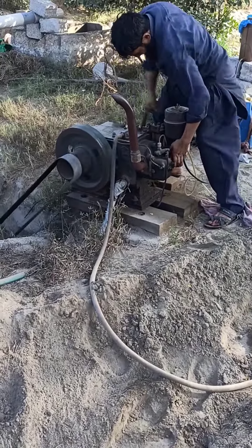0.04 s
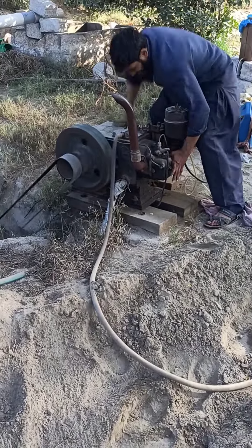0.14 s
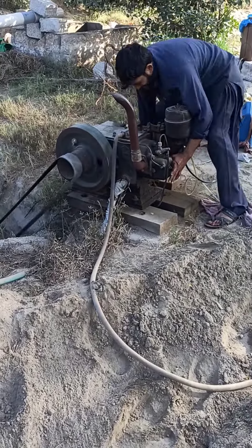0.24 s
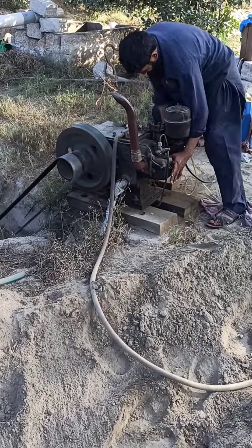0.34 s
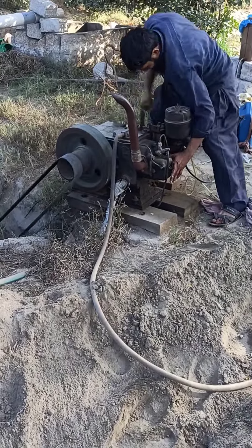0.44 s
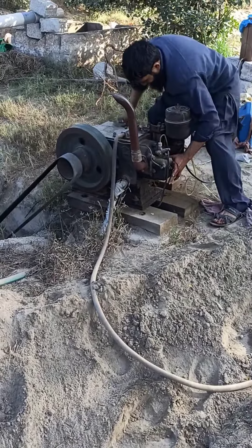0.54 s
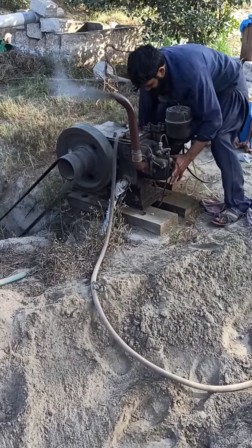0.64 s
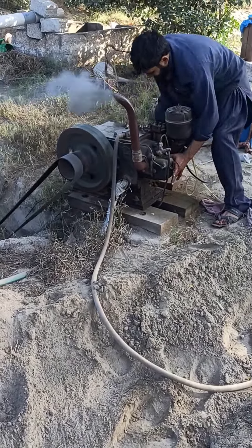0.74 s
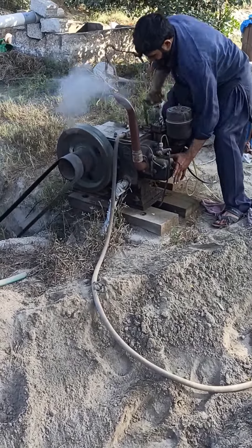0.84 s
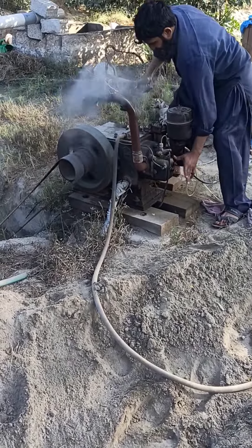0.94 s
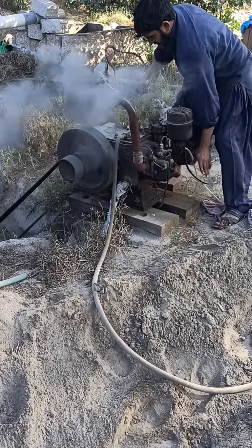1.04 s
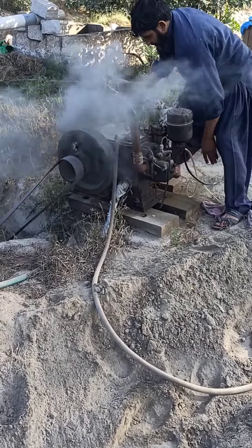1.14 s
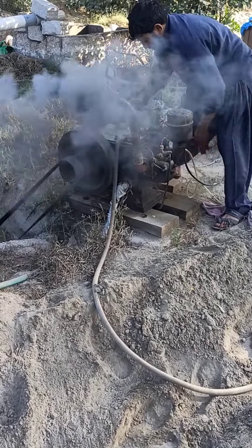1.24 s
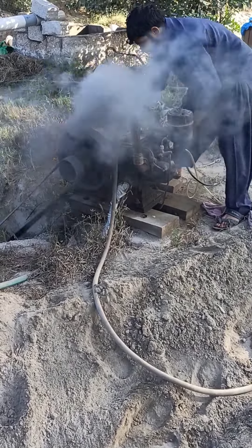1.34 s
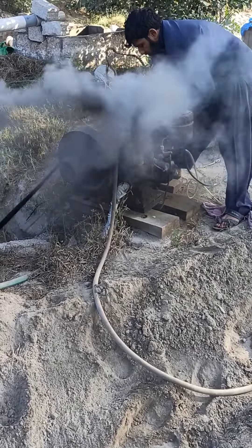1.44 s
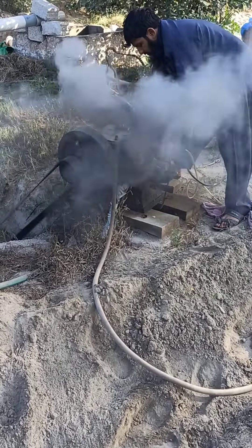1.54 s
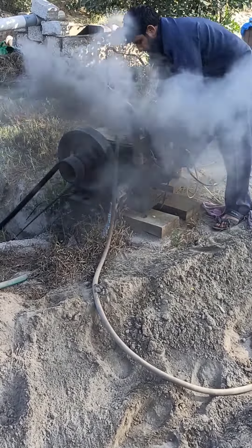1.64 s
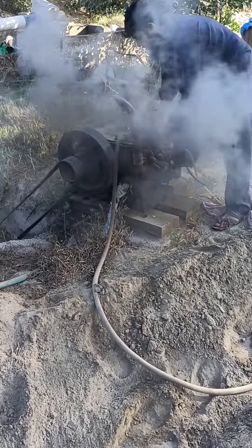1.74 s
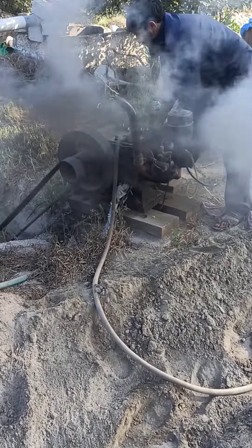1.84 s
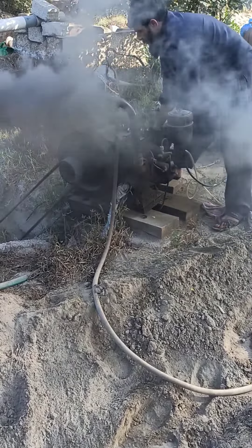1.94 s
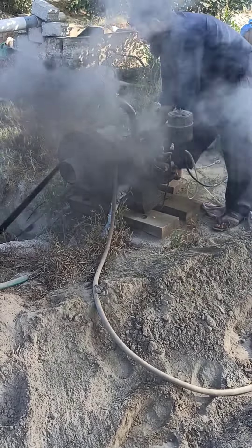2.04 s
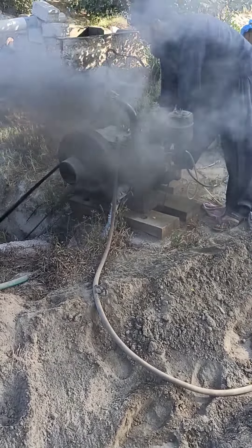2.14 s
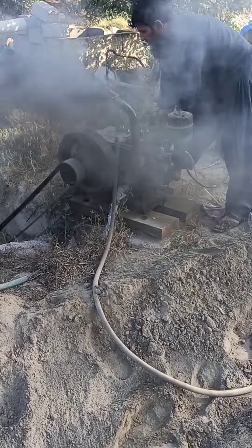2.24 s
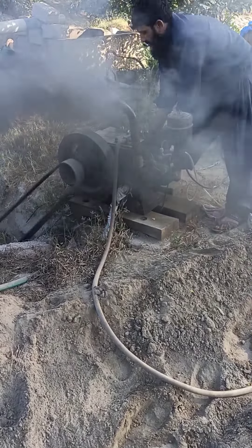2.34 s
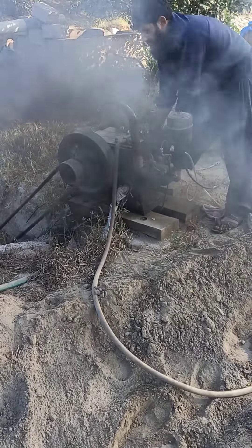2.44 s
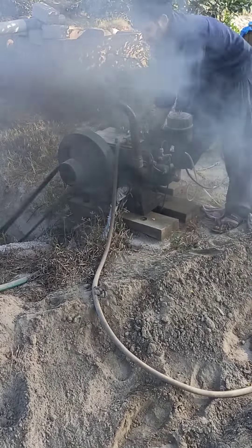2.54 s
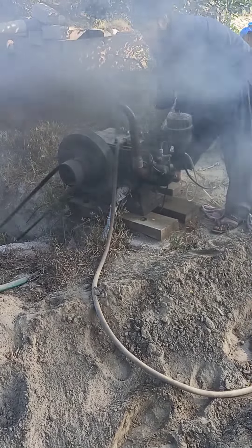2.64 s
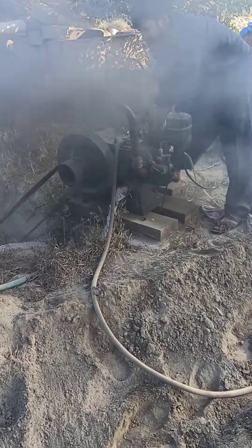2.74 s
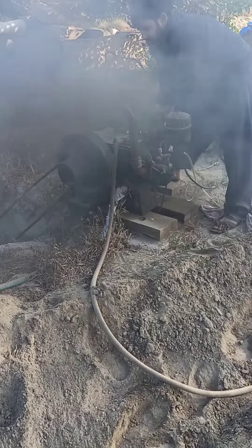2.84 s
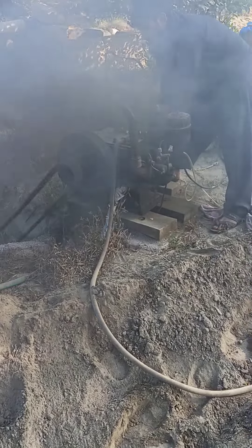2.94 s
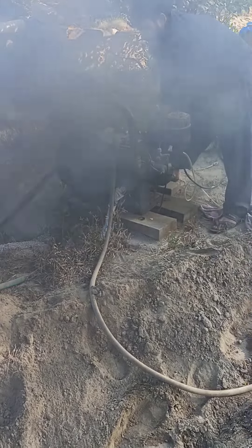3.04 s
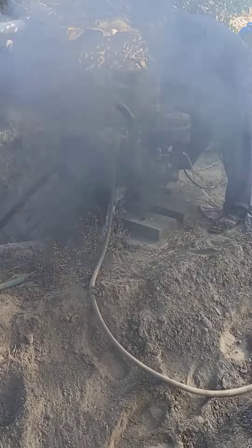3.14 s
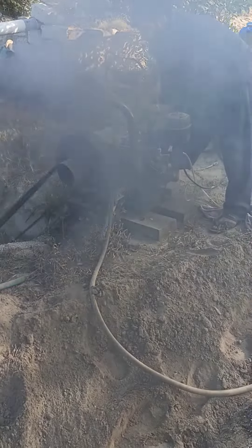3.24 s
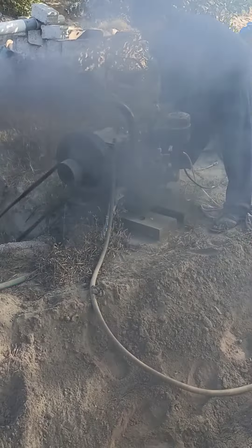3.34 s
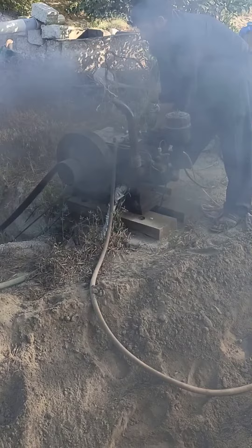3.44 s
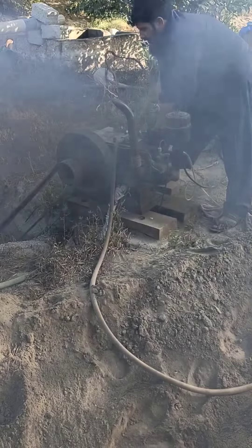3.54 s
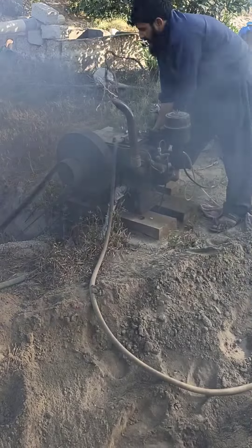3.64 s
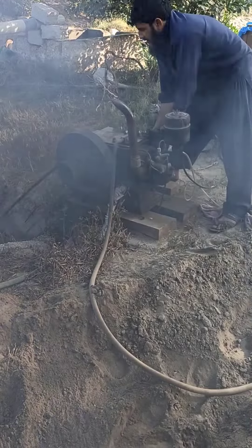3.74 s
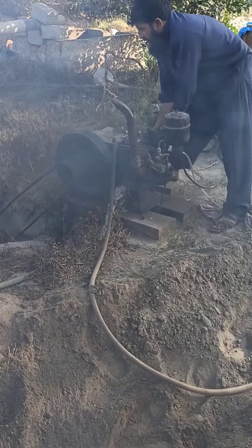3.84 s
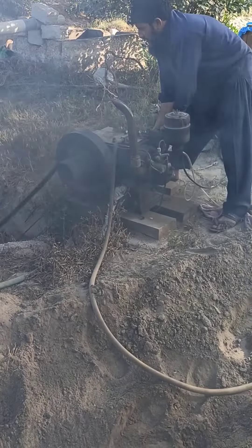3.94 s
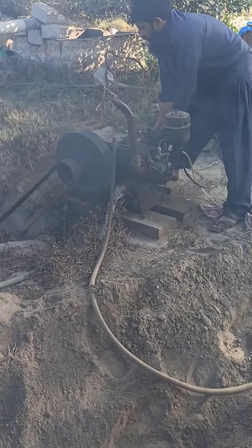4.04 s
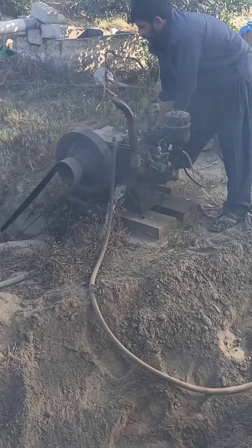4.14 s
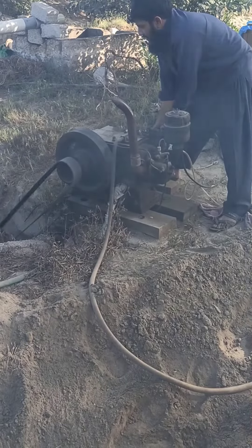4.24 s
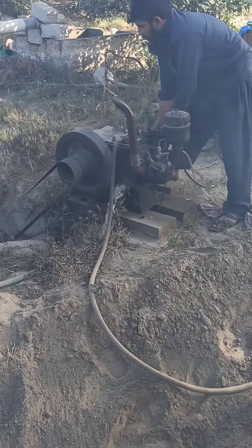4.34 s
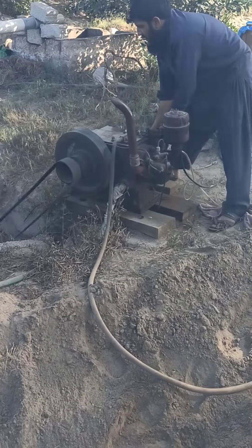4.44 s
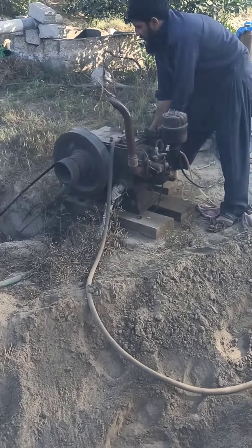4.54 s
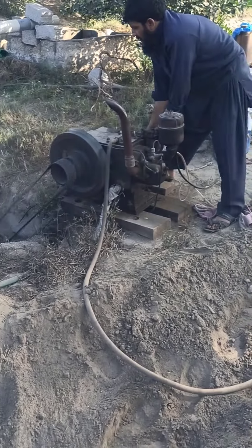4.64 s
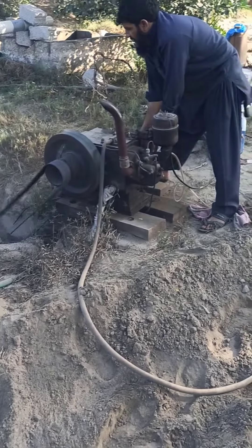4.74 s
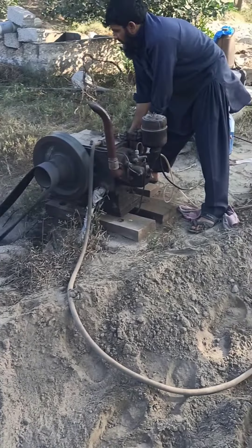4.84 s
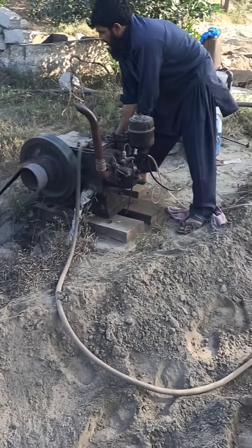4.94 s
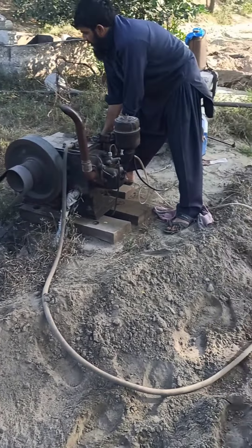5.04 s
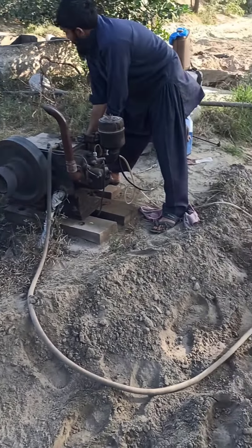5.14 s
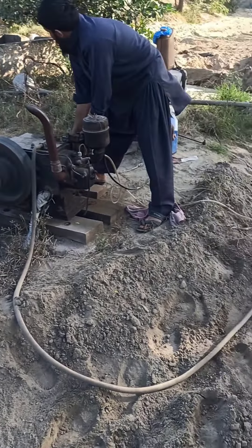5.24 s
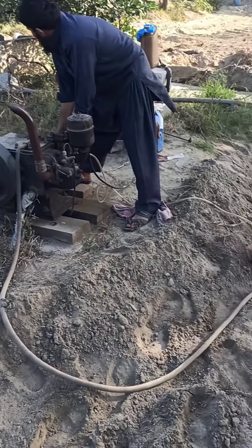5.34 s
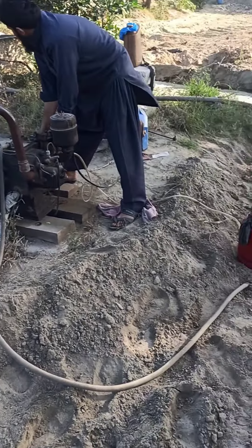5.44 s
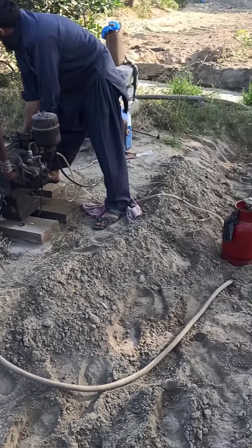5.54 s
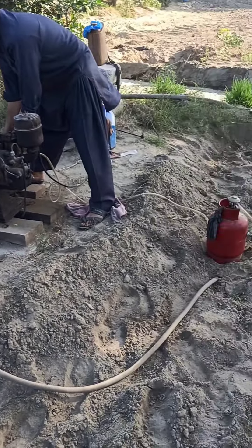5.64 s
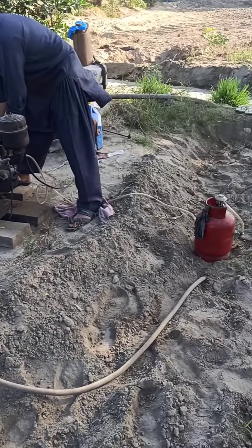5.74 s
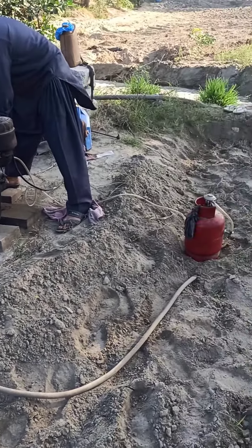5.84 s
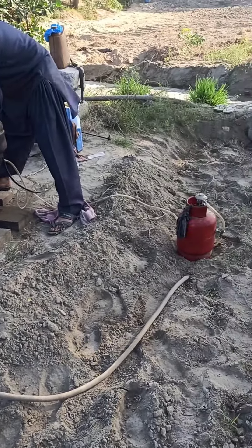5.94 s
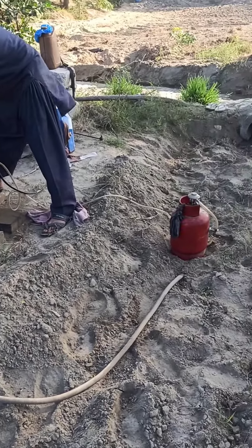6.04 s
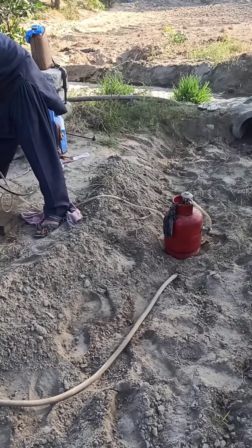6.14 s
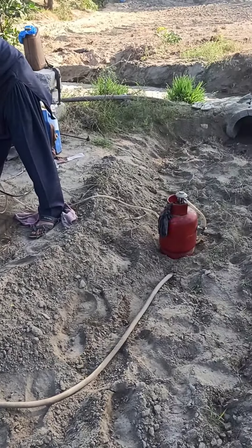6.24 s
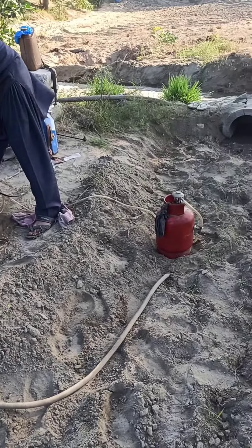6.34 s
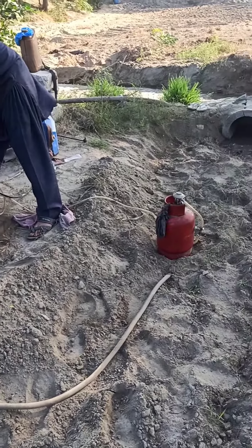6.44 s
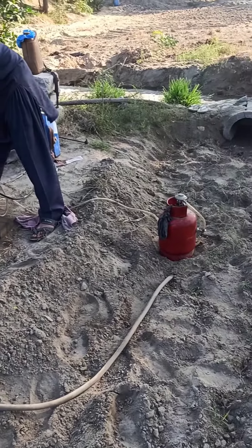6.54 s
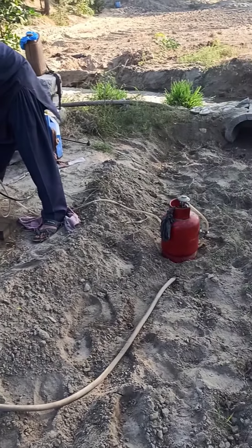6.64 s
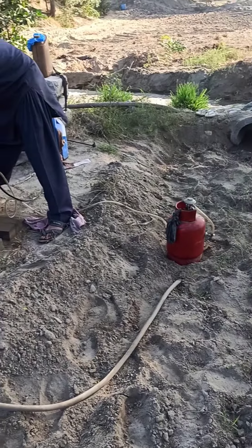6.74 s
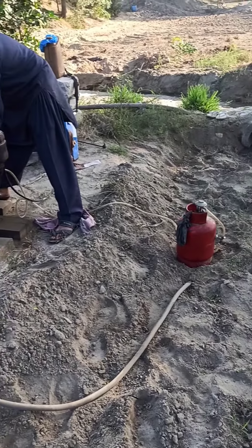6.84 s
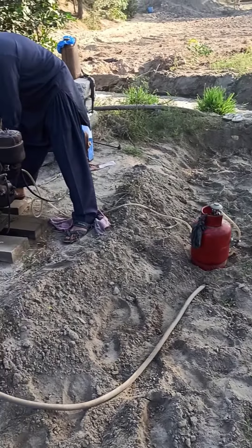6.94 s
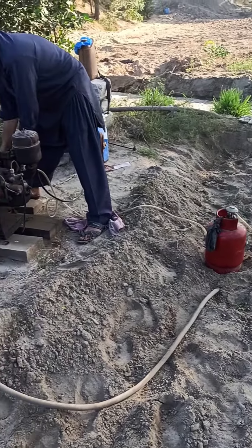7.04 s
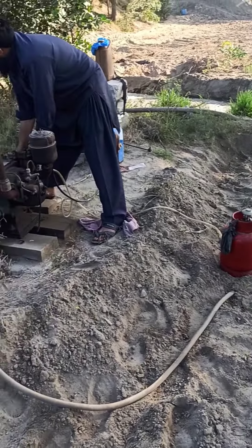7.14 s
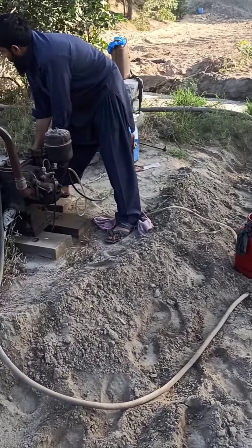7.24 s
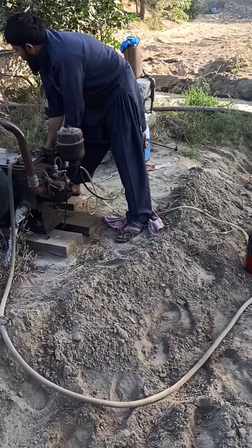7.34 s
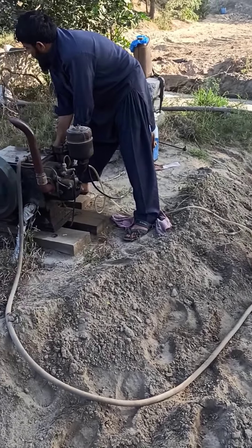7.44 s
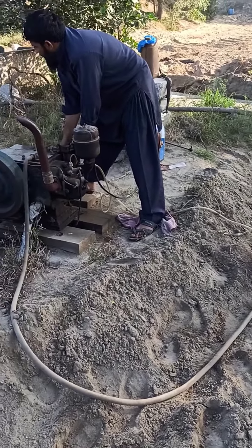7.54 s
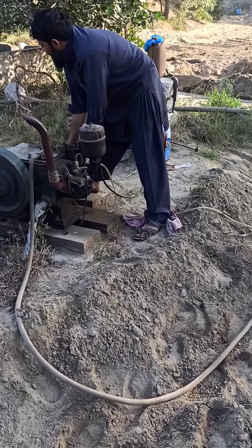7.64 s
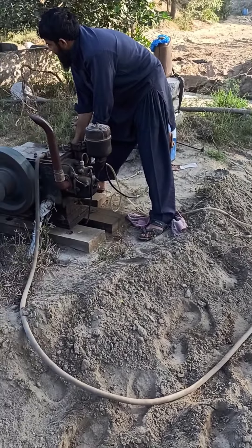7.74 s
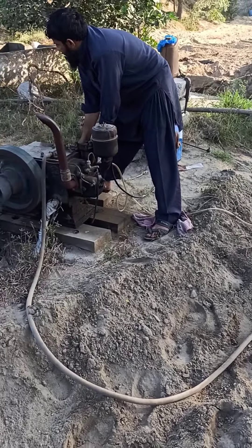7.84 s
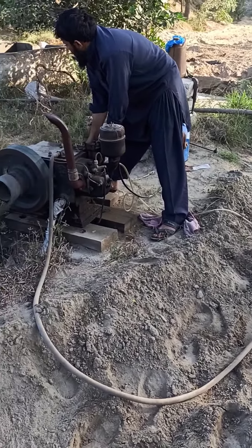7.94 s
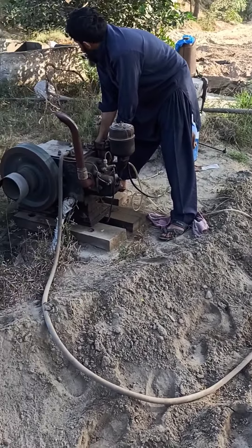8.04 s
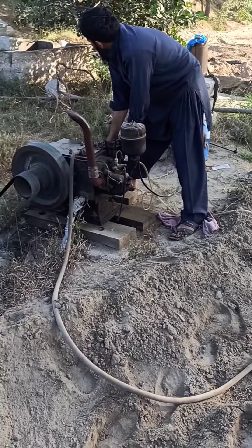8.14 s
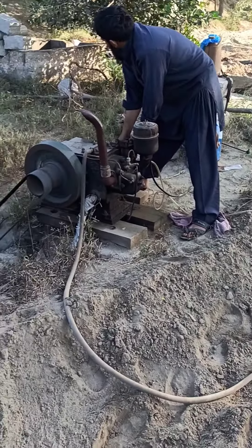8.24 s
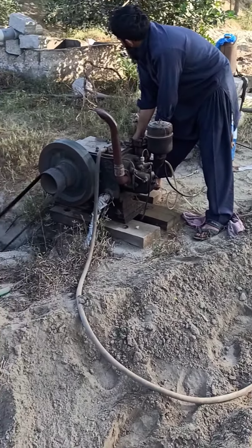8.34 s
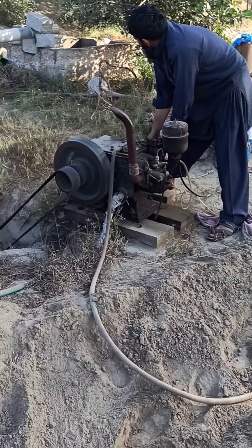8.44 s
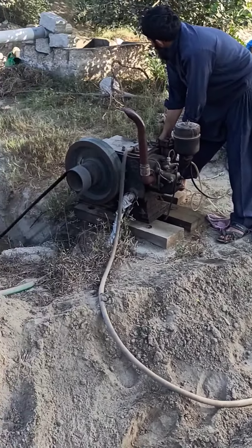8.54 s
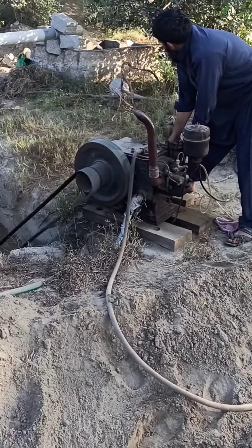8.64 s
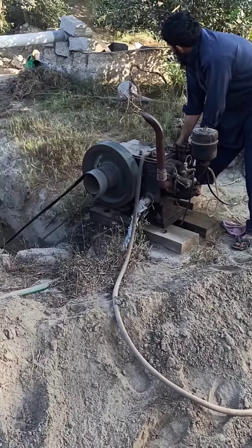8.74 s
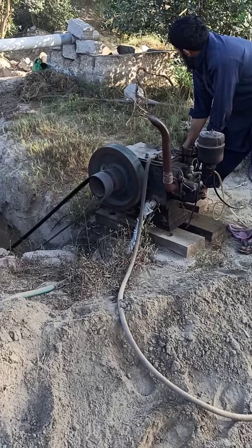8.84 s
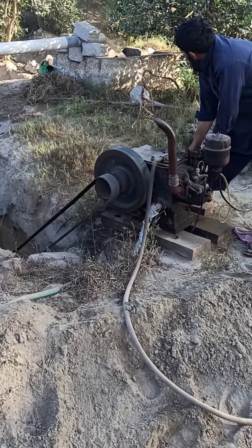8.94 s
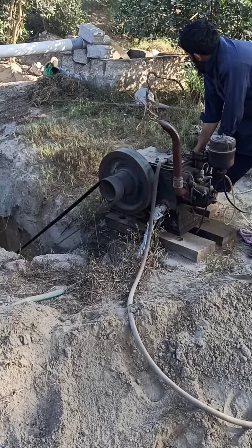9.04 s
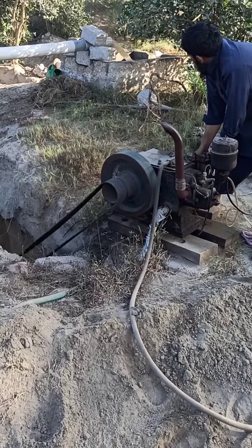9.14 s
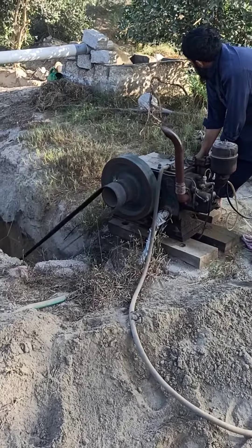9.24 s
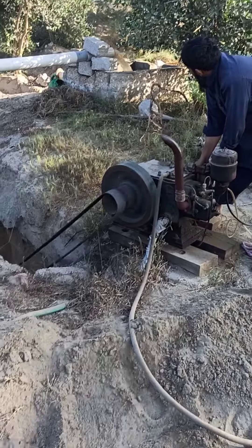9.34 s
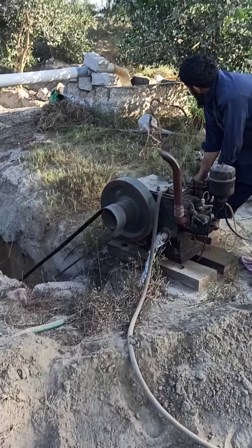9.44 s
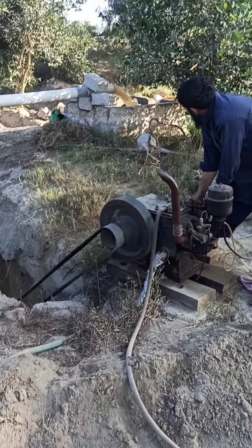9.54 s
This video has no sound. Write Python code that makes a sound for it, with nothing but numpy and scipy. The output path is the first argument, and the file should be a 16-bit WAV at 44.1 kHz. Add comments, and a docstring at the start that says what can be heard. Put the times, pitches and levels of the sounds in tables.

```python
"""Hand-cranked single-cylinder engine

It is cranked with clanks and squeaks, fires slowly, gathers speed and runs on. Each cycle: a knock rings the
block, a pop and a hissing jet of noise leave the exhaust, a hoot of cosines rises while the piston empties
the cylinder, then the shut pipe rings on its odd modes. Two close microphones, lightly overloaded."""
import sys
import numpy as np
from scipy import signal
from scipy.fft import rfft, irfft
from scipy.io import wavfile
from scipy.ndimage import map_coordinates

SR = 44100
rng = np.random.default_rng(int(sys.argv[2]) if len(sys.argv) > 2 else 0)


def dump(signal):
    """Clip the signal to [-1, 1] and save it as 16-bit WAV at the path in sys.argv[1]."""
    limited = np.clip(np.atleast_2d(signal).T, -1, 1)
    pcm = np.round(limited * 32767).astype(np.int16)
    wavfile.write(sys.argv[1], SR, pcm)


def linear_from_db(decibels):
    """Turn decibels (scalar or array-like) into linear amplitude factors; 0 gives 1."""
    return 10 ** (np.asarray(decibels, float) / 20)


N = 423360
FULL_SPEED_PER_S, USUAL_CHARGE_DB = 14, -11


def rms_one(x):
    """Scale to unit rms."""
    return x / np.sqrt(np.mean(x ** 2) + 1e-20)


def shape(x, points, share=1):
    """Filter by a (Hz, dB) table, interpolated over log frequency; share scales the dB."""
    hz, db = np.transpose(points)
    grid_hz = np.maximum(np.arange(N // 2 + 1) * SR / N, 1)
    gain_db = share * np.interp(np.log(grid_hz), np.log(hz), db)
    return irfft(rfft(x) * linear_from_db(gain_db), N)


def noise(points):
    """Gaussian noise coloured by a (Hz, dB) table, unit rms."""
    return rms_one(shape(rng.standard_normal(N), points))


def flicker(rate_per_s, depth_db):
    """Random gain: Gaussian dB steps at rate_per_s, joined by straight lines."""
    steps = rng.standard_normal(int(N / SR * 400) + 2)
    place = np.arange(N) / SR * rate_per_s % 3000
    return linear_from_db(depth_db * np.interp(place, np.arange(len(steps)), steps))


def ring(push, modes):
    """Sum of decaying modes (Hz, dB, t60 s), each a two-pole resonator driven by push."""
    out = 0
    for hz, db, t60_s in modes:
        r, w = linear_from_db(-60 / (t60_s * SR)), 2 * np.pi * hz / SR
        mode = signal.lfilter([np.cos(w)], [1, -2 * r * np.cos(w), r * r], push + 1e-18)
        out = out + linear_from_db(db) * mode * np.tan(w)
    return out


def bursts(times_s, db, rise_s, fall_s):
    """Envelope with a quick rise and an exponential fall at each time."""
    clicks = np.zeros(N)
    np.add.at(clicks, np.clip((np.asarray(times_s) * SR).astype(int), 0, N - 1), linear_from_db(db))
    up, down = np.exp(-1 / (rise_s * SR)), np.exp(-1 / (fall_s * SR))
    falling = signal.lfilter([1], [1, -down], clicks + 1e-18)
    return signal.lfilter([1 - up], [1, -up], falling)


# Flywheel speed. Each row: cycle number, speed in cycles per s.
SPEED = [(0, 2.235), (1, 3.275), (4, 5.309), (10, 8.323), (21, 11.865), (25, 12.58), (26, 12.444),
         (33, 12.732), (38, 12.758), (52, 13.837), (57, 14.05), (61, 14.022), (76, 14.323), (77, 14.157),
         (97, 13.842), (103, 13.337)]
FIRST_OPENING_S, CYCLES = .185, 104


def cycle():
    """Valve opening times, cycle lengths in s, and for every sample its cycle and share of it."""
    number, per_s = np.transpose(SPEED)
    # the square of the speed (stored energy) changes evenly between rows
    length = np.interp(np.arange(CYCLES + 1), number, per_s ** 2) ** -.5
    at = FIRST_OPENING_S + np.cumsum(length) - length
    t = np.arange(N) / SR
    which = np.maximum(np.searchsorted(at, t) - 1, 0)
    return at, length, which, (t - at[which]) / length[which]


# Running state. Each row: time in s, charge as jet level in dB, gas heat from 0 to 1.
RUNNING = [(.195, -28.5, 0), (.63, -14, 0.07), (1.5, -12, 0.05), (1.75, -11, 0.06), (3.3, -4.5, 0.15),
           (3.6, -4.5, 0.5), (3.75, -10.5, 0.46), (4.03, -15.5, 0.4), (4.27, -9, 0.4), (4.66, -14.5, 0.39),
           (5.2, -7.5, 0.52), (5.9, -8, 0.62), (6.8, -12, 0.53), (7.2, -7.5, 0.43), (7.7, -13, 0.45),
           (8.3, -9.5, 0.56), (8.6, -8, 0.55), (9.1, -13, 0.55), (9.6, -9.5, 0.62)]


def warmth(t):
    """A fuller charge heats the pipe: factor on its upper modes, fading in from 2.5 to 3.5 s."""
    share_per_db = .004
    charge_db = np.interp(t, *np.transpose(RUNNING)[:2])
    return 1 + share_per_db * (charge_db - USUAL_CHARGE_DB) * np.clip(t - 2.5, 0, 1)


# Knocks of the cold engine, before ten pops from the third on. Each row: time in s, relative level in dB.
COLD_KNOCKS = [(0.856, -15), (1.135, -19), (1.352, -13), (1.547, -14), (1.718, -12.5), (1.877, -10.5),
               (2.023, -14), (2.158, -13.5), (2.284, -12.5), (2.406, -10.5)]
# Numbers of the cycles with a harder knock.
HARD_KNOCKS = [19, 23, 34, 47, 51, 54, 57, 65, 67, 76, 88, 96, 97, 102, 103]
# Slow swell of the pipe ring. Each row: time in s, gain in dB.
RING_DRIFT = [(0.2, -16), (.63, -7), (.93, -8), (1.18, -7), (1.4, -5.5), (1.9, -3.5), (2.5, 1), (3.3, -1),
              (4, -1), (4.8, -0.5), (5.5, -2), (6.3, -3.5), (7.2, 1), (8, -2), (8.8, -2.5), (9.6, -5.5)]
# Each law: dB at usual charge and full speed, share of charge swing, share of speed swing, chance dB.
POP_LAW = (-0.5, -0.063, 0.43, 0.72)
RING_LAW = (-19.5, -0.37, -0.16, 0.4)
KNOCK_LAW = (-19, 0.5, 0, 1.5)
HISS_LAW = (-29.5, 0.23, 1.46, 0.34)
RATTLE_LAW = (-23.5, 0.08, 1.02, -0.2)


def strengths():
    """Per cycle: dB of jet, pop, ring, knock, hiss and rattle from charge and speed; knock lead in s."""
    jet_chance_db, unfired_loss_db, hard_knock_db, cold_knock_db = 1.22, 12, 3, -2
    lead_share, lead_chance_share = .222, .009
    at, length = cycle()[:2]
    luck = rng.standard_normal((len(at), 7))
    charge_db = np.interp(at, *np.transpose(RUNNING)[:2]) + jet_chance_db * luck[:, 0]
    speed_db = 20 * np.log10(1 / (length * FULL_SPEED_PER_S))
    levels = []
    for k, law in enumerate((POP_LAW, RING_LAW, KNOCK_LAW, HISS_LAW, RATTLE_LAW)):
        db, by_charge, by_speed, chance_db = law
        swing_db = by_charge * (charge_db - USUAL_CHARGE_DB) + by_speed * speed_db
        levels.append(db + swing_db + chance_db * luck[:, k + 1])
    pop, ringing, knock, hiss, rattle = levels
    number = np.arange(len(at))
    pop = pop - unfired_loss_db * (number == 0)
    knock = knock + hard_knock_db * np.isin(number, HARD_KNOCKS) - unfired_loss_db * (number < 2)
    # the lead is a share of the cycle before
    lead = (lead_share + lead_chance_share * luck[:, -1]) * np.append(length[0], length[:-1])
    cold_s, cold_db = np.transpose(COLD_KNOCKS)
    cold = slice(2, 2 + len(cold_s))
    lead[cold], knock[cold] = at[cold] - cold_s, cold_db + cold_knock_db
    ringing = ringing + np.interp(at, *np.transpose(RING_DRIFT))
    return charge_db, pop, ringing, knock, hiss, rattle, lead


def frame(heat):
    """Frame hum: noise through one narrow resonance, fainter as the gas heat rises."""
    hum = rms_one(ring(rng.standard_normal(N), [(321.2, 0, 0.14)]))
    return linear_from_db(-33.0 - 6.2 * heat) * flicker(16, 1.5) * hum


def first_push():
    """The unfired first stroke pushes air out softly: one low swell."""
    start_s, length_s, hz, db = .18, .1, 74, -20
    since = np.arange(N) / SR - start_s
    swell = np.sin(np.pi * np.clip(since / length_s, 0, 1))
    return linear_from_db(db) * swell * np.sin(2 * np.pi * hz * since)


# Air over the microphones. Each row: time in s, relative level in dB.
PUFF = [(0.2, -23), (0.6, -15), (3.3, -5), (4.7, -21), (5.7, -3), (6.3, -8), (7.2, -5), (7.7, -8),
        (8.8, -1), (9.6, -14)]


def puffs():
    """Every pop pushes a puff of air: a soft low thump, not quite alike in the two microphones."""
    hz, t60_s, push_s, chance_db, own_chance_db = 38, 0.053, .004, 4, 3.5
    at = cycle()[0]
    luck = rng.standard_normal((len(at), 3))
    db = np.interp(at, *np.transpose(PUFF)) + chance_db * luck[:, 0]
    thumps = []
    for k in (1, 2):
        push = bursts(at, db + own_chance_db * luck[:, k], push_s / 2, push_s) / (push_s * SR)
        thumps.append(ring(push, [(hz, 0, t60_s)]))
    return np.array(thumps)


def low_throb(pop_db):
    """A low swell late in every cycle, its level tied to the pop."""
    start_share, span_share, hz, db = .46, .3, 95, -22
    at, length, which, share = cycle()
    part = np.clip((share - start_share) / span_share, 0, 1)
    tone = np.cos(2 * np.pi * hz * (part - .5) * span_share * length[which])
    return linear_from_db(pop_db[which] + db) * np.sin(np.pi * part) * tone


# Crank handle and dog. Each row: mode in Hz, level in dB, t60 in s.
HANDLE = [(1900, 2, .018), (2250, 2, .02), (2620, 0, .025), (3120, 0, .02), (3720, -2, .03),
          (4500, -5, .02), (5150, -6, .015), (6200, -8, .015), (6900, -8, .015), (7600, -8, .02)]
# Clanks. Each row: time in s, relative level in dB, relative thud level in dB, brightest pitch in Hz.
CLANKS = [(0.0848, -11, -30, 7000), (0.114, -9.5, -43, 3120), (0.134, -10, -38, 3530),
          (0.304, -21, -26, 2430), (0.357, -29, -40, 1650), (0.4103, -26, -20.5, 1820),
          (.325, -36, -45, 4230), (0.432, -25, -45, 3570), (0.4864, -10, -41, 3280),
          (0.597, -26, -19, 1950), (0.788, -18, -20, 1910), (0.8044, -19, -41, 5360),
          (0.8317, -14, -29, 3440), (0.911, -27, -28, 4800), (.888, -29, -16, 1900), (.725, -26, -36, 2200),
          (1.014, -24, -28, 2080), (1.064, -14, -15, 1860), (1.079, -15, -43, 7500), (1.14, -22, -9, 2500),
          (1.2947, -19, -14, 7500)]
# Metal squeaks. Each row: start in s, end in s, start pitch in Hz, end pitch in Hz, level in dB.
SQUEAKS = [(.487, .504, 3230, 3330, -17), (.5, .517, 5000, 6400, -33), (.522, .537, 4450, 4600, -34),
           (.49, .505, 6800, 6700, -36), (.488, .51, 6200, 6150, -38), (.52, .535, 5800, 5600, -38),
           (.52, .532, 6800, 7000, -37), (.504, .52, 3200, 3350, -31), (.512, .536, 3800, 3790, -14),
           (.49, .532, 2950, 2650, -28), (.534, .554, 2700, 2760, -31), (.53, .565, 3830, 3850, -33),
           (.514, .575, 7650, 7650, -34), (.795, .88, 5380, 5420, -44)]


def cranking():
    """Clanks ring the handle most near their brightest pitch, with a dull thud; metal squeaks glide."""
    width_octaves, far_db, ring_db, chance_db = 0.52, -12, -11.5, 4.2
    out, t = np.zeros(N), np.arange(N) / SR
    rough = rng.standard_normal(N) * flicker(400, 4)
    dull = noise([(150, 8.5), (300, 13), (900, -3.5), (2500, -49)])
    luck = rng.standard_normal((len(CLANKS), len(HANDLE)))
    for (s, db, thud_db, bright_hz), chance in zip(CLANKS, luck):
        near = slice(int(s * SR), int((s + 0.18) * SR))
        since = t[near] - s
        modes = []
        for (hz, mode_db, t60_s), c in zip(HANDLE, chance):
            far = min(abs(np.log2(hz / bright_hz)) / width_octaves, 1)
            modes.append((hz, mode_db + chance_db * c + far_db * far, t60_s))
        blow = np.exp(-since / 0.006) * rough[near]
        contact = linear_from_db(-8) * signal.lfilter([.6], [1, -.4], blow)
        out[near] += linear_from_db(db + ring_db) * (ring(blow, modes) / 5 + contact)
        out[near] += linear_from_db(thud_db - 4.5) * np.exp(-since / 0.031) * dull[near]
    for start, end, start_hz, end_hz, db in SQUEAKS:
        part = np.clip((t - start) / (end - start), 0, 1)
        hz = (start_hz + (end_hz - start_hz) * part) * flicker(300, .06)
        swell = flicker(300, 3) * np.sin(np.pi * part) ** .7
        out += linear_from_db(db) * swell * np.sin(2 * np.pi * np.cumsum(hz) / SR)
    return out


# Engine block. Each row: mode in Hz, level in dB, t60 in s.
BLOCK = [(291, -13.5, 0.04), (370, -18.5, 0.039), (460, -19, 0.052), (590, -16.5, 0.019), (727, -9, 0.048),
         (764.5, -9.5, 0.037), (894, -16.5, 0.074), (1070, -11.5, 0.0069), (1250, -18.5, .015),
         (1650, -31, 0.011), (2060, -22, 0.014), (2405, -18.5, 0.023)]
# Valve gear contacts of every cycle. Each row: share of cycle, relative level in dB.
CONTACTS = [(.16, -40.5), (0.251, -37.5), (0.32, -34), (0.62, -37)]
# Loose parts. Each row: frequency in Hz, gain in dB.
RATTLE = [(45, -3.5), (90, -7), (170, -1.5), (260, -3.5), (320, -11.5), (400, -4), (700, -7.5), (920, -8),
          (1100, -16.5), (1600, -22.5), (4000, -49.5)]


def block(knock_db, lead, rattle):
    """Combustion shakes the block about a fifth of a cycle before the pop; valve gear clacks, parts rattle."""
    breath_share = 0.42
    at, length, which, share = cycle()
    knock = bursts(at - lead - .002, knock_db - 15, .002, .006)
    shake = knock * linear_from_db(6.0) * flicker(250, 1.3)
    for part, db in CONTACTS:
        luck = rng.standard_normal((len(at), 2))
        contact_s = at + (part + 0.0055 * luck[:, 0]) * length
        shake = shake + bursts(contact_s, db + 3 * luck[:, 1], 0.00083, 0.0015)
    blows = shake * rng.standard_normal(N)
    struck = ring(blows, BLOCK) + linear_from_db(5.5) * shape(blows, NOISE_BANDS)
    swing = linear_from_db(breath_share * np.interp(share, *np.transpose(BREATH)))
    return struck + rattle * swing * flicker(30, 1.77) * noise(RATTLE)


def cylinder_gas(knock_db, lead):
    """Burning gas rings in the cylinder: a tone per knock, higher at speed, sagging as the piston drops."""
    full_speed_hz, speed_power, sag, chance_share, db, full_speed_span_s = 823, .7, 0.06, 0.0398, -9.5, 0.0059
    at, length = cycle()[:2]
    t, speed = np.arange(N) / SR, 1 / (length * FULL_SPEED_PER_S)
    knock_s = at - lead
    which = np.maximum(np.searchsorted(knock_s, t) - 1, 0)
    span_s = full_speed_span_s / np.sqrt(speed)
    age = np.maximum(t - knock_s[which] + .002, 0) / span_s[which]
    start_hz = full_speed_hz * speed ** speed_power * (1 + chance_share * rng.standard_normal(len(at)))
    tone = np.sin(2 * np.pi * np.cumsum(start_hz[which] / (1 + sag * age)) / SR)
    swell = np.e * age * np.exp(-age)
    return linear_from_db(knock_db + db)[which] * swell * flicker(300, 5) * tone


# Pipe wall. Each row: mode in Hz, level in dB, t60 in s, dB gained per sample of microphone lag lost.
WALL = [(1650, -28, 0.055, 7.5), (1910, -7, 0.038, -2), (2124, -8, 0.011, 4), (2222, -3.5, 0.053, -10),
        (3245, -4, 0.059, -1.7), (3760, -2, 0.053, -6.8), (4495, 2, 0.024, -2.5), (4670, -3.5, 0.022, -2),
        (6500, -14, 0.011, 4.5), (7480, -10.5, 0.036, -1.5)]


def wall(jet_db, lag_lost):
    """The jet sets the pipe wall ringing; every blast strikes each mode with a strength of its own."""
    at, length, which, share = cycle()
    strength = linear_from_db(4 * rng.standard_normal((CYCLES + 1, len(WALL))))
    push = bursts(at + 0.0012, jet_db - 18.0, 0.0016, 0.0037) * rng.standard_normal(N)
    out = 0
    for k, (hz, db, t60_s, turn_db) in enumerate(WALL):
        blow = push * strength[which, k] * linear_from_db(turn_db * lag_lost)
        out = out + ring(blow, [(hz, db, t60_s)])
    return out


# Exhaust stroke. Each row: share of cycle, cold pitch in Hz, then relative dB of the first mode, its octave,
# the third mode, the fifth mode.
STROKE = [(0, 65, -34, -40, -47, -53), (0.058, 79, -14, -42, -41, -49), (0.141, 110, 1, -27, -57, -57),
          (0.22, 144, 4, 1.5, -9, -1), (0.299, 183, 9.5, -8, 7, -5), (.42, 191.4, 0.5, -33, 9.5, 1),
          (.55, 191.7, 4, -23, -9, -12), (0.751, 189, -1, -25, -20, -27), (1, 186, -6.5, -30, -9, -28)]


def exhaust_stroke(ring_db, heat):
    """The shrinking cylinder lifts the gas column's pitch; as the valve shuts, the odd pipe modes ring."""
    hot_pipe_hz, heat_lift, hot_start_db, shut_share = 194.7, 2.03, -28, .273
    at, length, which, share = cycle()
    part, cold_hz, *mode_db = np.transpose(STROKE)
    cold_hz = np.interp(share, part, cold_hz)
    # a hot stroke starts near the pipe pitch and softly
    hz = cold_hz + np.minimum(heat_lift * heat, 1) * (hot_pipe_hz - cold_hz)
    turns = np.cumsum(hz) / SR
    warm_turns = np.cumsum(hz * warmth(np.arange(N) / SR)) / SR
    # all modes crest together as the valve shuts
    shut = np.minimum((at + shut_share * length) * SR, N - 1).astype(int)
    turns, warm_turns = turns - turns[shut][which], warm_turns - warm_turns[shut][which]
    slow_fade_db = 105 * (.75 - heat) * (.17 - np.minimum(share, .4))  # slow cold strokes fade early
    soft_start_db = hot_start_db * heat * np.clip(1 - share / 0.24, 0, 1)
    gate = np.clip((1 - share) * 30, 0, 1) * (share > 0)
    level = linear_from_db(ring_db[which] + slow_fade_db + soft_start_db + 2.5) * gate
    out = 0
    for order, db in zip((1, 2, 2.92, 4.82), mode_db):  # the open end pulls upper modes a little flat
        upper_db = -10 * (.75 - heat) * (order > 1)  # fast flow feeds the upper modes
        tone = np.cos(2 * np.pi * order * (warm_turns if order > 2 else turns))
        out = out + linear_from_db(np.interp(share, part, db) + upper_db) * flicker(60, 1.1) * tone
    return level * out


# Colour of the jet. Each row: frequency in Hz, gain in dB.
JET = [(900, 7.5), (1400, -4.5), (2070, 8.5), (2900, 2), (3250, 4.5), (3760, 4.5), (4450, 5.5),
       (5000, -1.5), (5900, 0.5), (6500, 1.5), (7000, 0.5), (7500, 2), (8300, -8.5), (13000, -21)]
# Noise heard in hiss and contacts, with a band nearly missing from 9 to 11.5 kHz that is no trait of
# either source. Each row: frequency in Hz, gain in dB.
NOISE_BANDS = [(900, -55), (1150, 6), (1500, 0.5), (2100, 6), (2500, 3), (2900, -3), (3400, -1.5),
               (4000, 1.5), (4600, -2), (5000, -7.5), (5800, -13.5), (6400, -1.5), (7500, -4.5),
               (8400, -17), (9000, -37), (11200, -48), (11800, -26), (14000, -26.5)]
# Swing of the hiss over the cycle, partly felt by the rattle. Each row: share of cycle, gain in dB.
BREATH = [(0, 6), (.3, -1), (.48, -4.5), (.62, 1.5), (.72, -1), (.8, 3.5), (.93, -2), (1, 0)]


def jet(jet_db, hiss_db):
    """Gas tears out for some 10 ms, longer at low speed, then trails off; a hiss swings with the cycle."""
    at, length, which, share = cycle()
    since = np.maximum(share * length[which] - .0004, 0)
    span_s = 0.0045 * (length[which] / 0.076) ** 0.72
    blast = (since / span_s) ** 1.21 * np.exp(-(since / span_s) ** 2.63) * linear_from_db(1.0)
    trail = linear_from_db(-14.5) * np.exp(-share / 0.18) * np.minimum(since / span_s, 1) * flicker(90, 3.5)
    # sharp-edged treble noise above 11 kHz at each opening
    top_noise = noise([(9000, -55), (12000, -2.5), (16000, -3.5)])
    top_band = linear_from_db(-22.5) * np.exp(-since / 0.012) * (since > 0) * top_noise
    gusty = noise(JET) * flicker(500, 2.5)
    hiss_level = linear_from_db(hiss_db + np.interp(share, *np.transpose(BREATH)))
    hiss = hiss_level * flicker(25, 0.98) * flicker(180, 4.08) * noise(NOISE_BANDS)
    return linear_from_db(jet_db)[which] * ((blast + trail) * gusty + top_band) + hiss


# Pop at the pipe mouth. Each row: mode in Hz, level in dB, t60 in s, lead in turns.
MOUTH = [(90, -14, .09, .31), (168, -12, .1, .07), (240, -17, .012, 0), (420, -17, .03, .04),
         (576, -3.8, .023, 0), (900, -25, .02, .1)]


def pops(pop_db):
    """A pressure crest builds in about a millisecond, leaves the pipe and rings at its mouth."""
    size, rise = 2600, 50  # samples
    out = np.zeros(N + SR)
    t = (np.arange(size) - rise) / SR
    build = np.sin(np.pi / 2 * np.clip(np.arange(size) / rise, 0, 1)) ** 2
    for s, level_db in zip(cycle()[0], pop_db):
        crest = 0
        for hz, db, t60_s, lead in MOUTH:
            warm_hz = hz * warmth(s) ** (hz > 400)
            decay = linear_from_db(db - 60 * np.maximum(t, 0) / t60_s)
            crest = crest + decay * np.cos(2 * np.pi * (warm_hz * t + lead))
        out[int(s * SR) - rise:][:size] += linear_from_db(level_db) * build * crest
    return out[:N]


# The microphones turn away and back. Each row: time in s, lag of the right one in samples.
TURNING = [(0, 8.2), (5.0, 7.34), (6.1, 5.1), (7.1, 6.6), (7.7, 6.76), (8.5, 7.67), (9.6, 6.24)]
# Left over right microphone. Each row: frequency in Hz, level difference in dB.
LEFT_OVER_RIGHT = [(60, -0.5), (99, -1.0), (160, -2.0), (270, -1.5), (450, 2.5), (740, -1.0), (1220, 3.0),
                   (2010, -3.5), (3330, 0.0), (5500, 0.0), (9080, 5.5), (15000, 3.0)]
# Turbulence and rattle that one microphone hears alone. Each row: frequency in Hz, gain in dB.
UNSHARED = [(60, -9), (300, -4), (700, -10), (1500, -2), (4000, 3.5), (7000, 4), (16000, 11)]


def scene():
    """Each microphone adds turbulence and rattle of its own to the engine; the right one is further away."""
    turn_hiss_db_per_sample, handle_rattle_db, handle_off_s = 0.4, -40.5, 0.24
    t, at = np.arange(N) / SR, cycle()[0]
    jet_db, pop_db, ring_db, knock_db, hiss_db, rattle_db, lead = strengths()
    heat = np.interp(t, *np.transpose(RUNNING)[::2])
    lag = np.interp(t, *np.transpose(TURNING))
    lag_lost = lag[0] - lag
    hiss_db = np.interp(t, at, hiss_db) + turn_hiss_db_per_sample * lag_lost
    # extra rattle at the start, soon faded out
    handle = linear_from_db(handle_rattle_db) / (1 + np.exp(np.minimum((t - handle_off_s) / 0.02, 50)))
    rattle = linear_from_db(np.interp(t, at, rattle_db)) + handle
    shared, *own = [jet(jet_db, hiss_db) + block(knock_db, lead, rattle) for draw in range(3)]
    engine = frame(heat) + first_push() + low_throb(pop_db) + cranking() + shared
    engine = engine + cylinder_gas(knock_db, lead) + wall(jet_db, lag_lost)
    engine = engine + exhaust_stroke(ring_db, heat) + pops(pop_db)
    left, right = [engine + shape(x, UNSHARED) for x in own]
    left = np.roll(shape(left, LEFT_OVER_RIGHT, share=.5), -4)
    right = shape(right, LEFT_OVER_RIGHT, share=-.5)
    right = map_coordinates(right, [np.arange(N) - lag + 4], order=3)
    return np.array([left, right]) + puffs()


def top_cut(x):
    """Nothing passes above the cut-off."""
    return signal.sosfilt(signal.butter(12, 16420, fs=SR, output="sos"), x)


def record(dry):
    """Peaks hit the ceiling, the bass is cut, one treble band is nearly missing and the top is dulled."""
    low_hz, high_hz, gap_db = 8500, 11600, -18
    bass = [(25, -20), (48, -17), (65, -6), (90, 0)]
    gap = [(low_hz * .99, 0), (low_hz * 1.02, gap_db), (high_hz * .99, gap_db), (high_hz, 0)]
    top = [(15700, 0), (15900, -22)]
    mix = np.array([shape(channel, bass + gap + top) for channel in np.clip(dry, -1, 1)])
    return top_cut(np.clip(mix, -1, 1))


dry = scene()
out = record(dry)
dump(out)
```